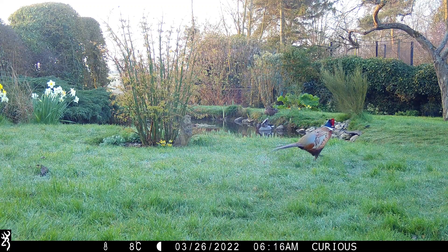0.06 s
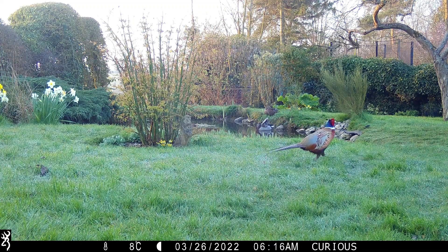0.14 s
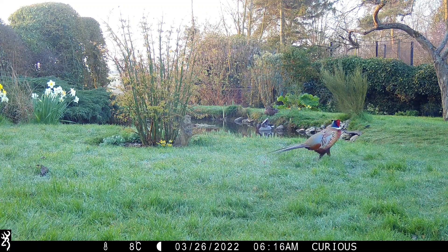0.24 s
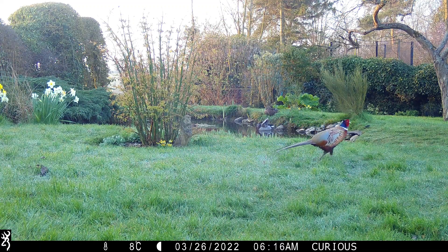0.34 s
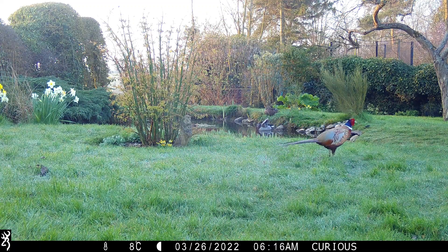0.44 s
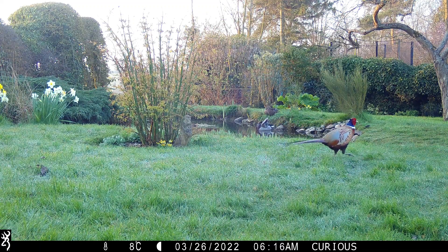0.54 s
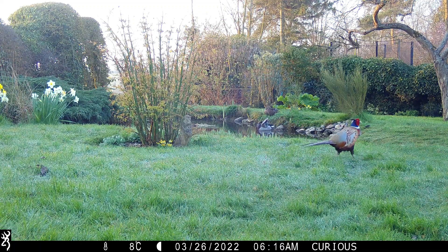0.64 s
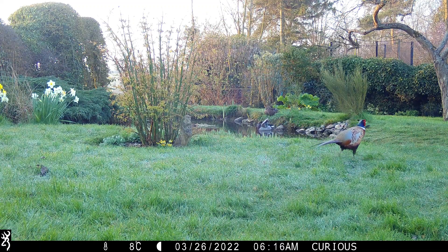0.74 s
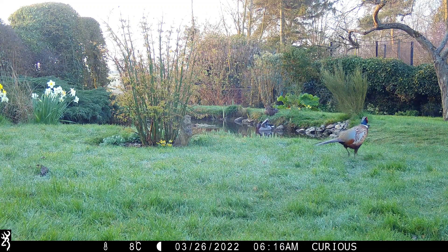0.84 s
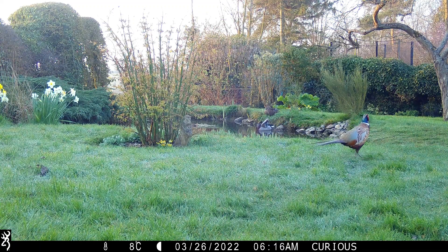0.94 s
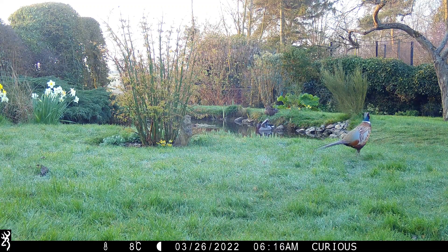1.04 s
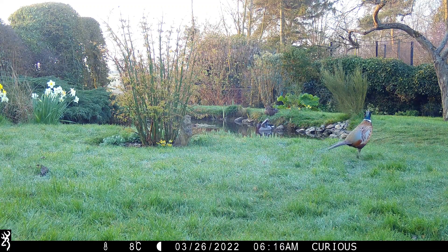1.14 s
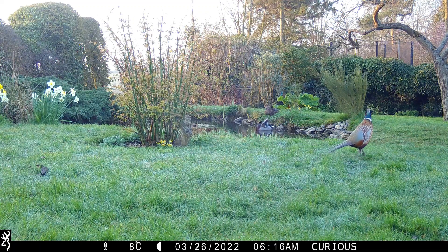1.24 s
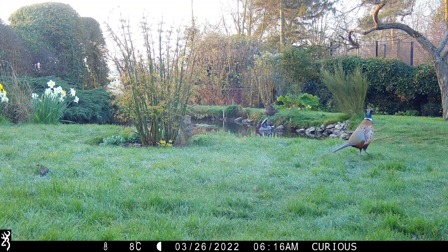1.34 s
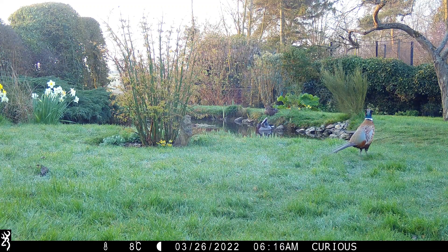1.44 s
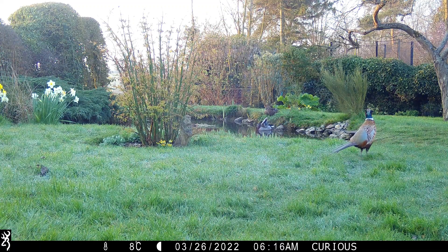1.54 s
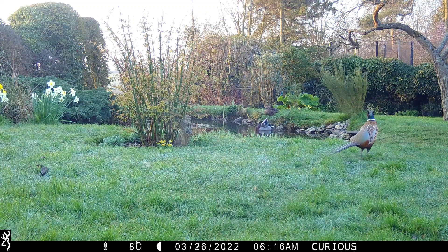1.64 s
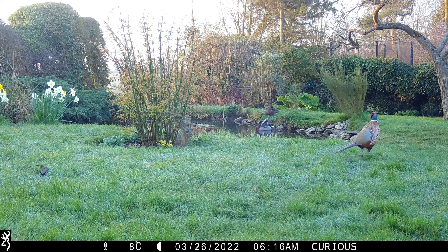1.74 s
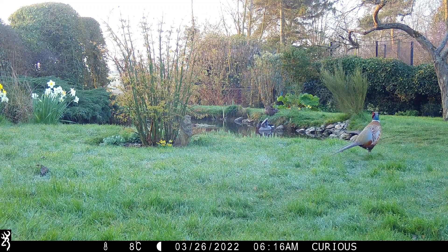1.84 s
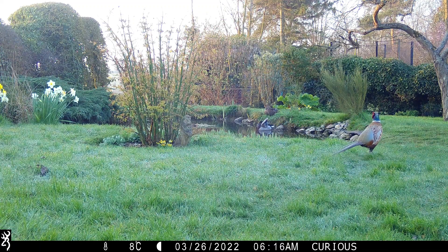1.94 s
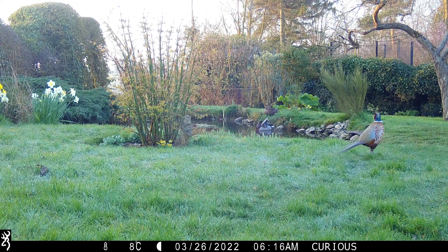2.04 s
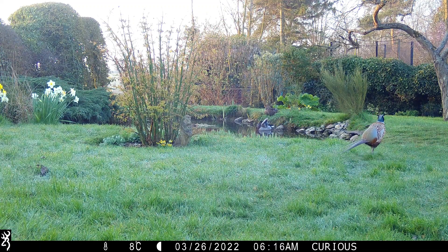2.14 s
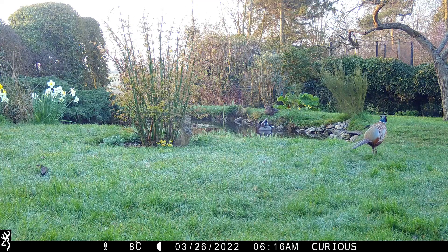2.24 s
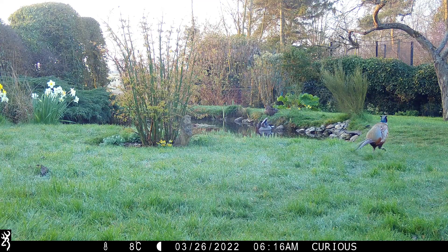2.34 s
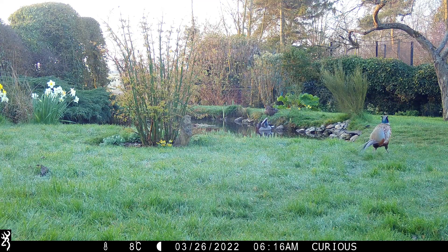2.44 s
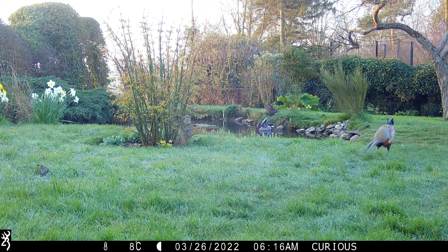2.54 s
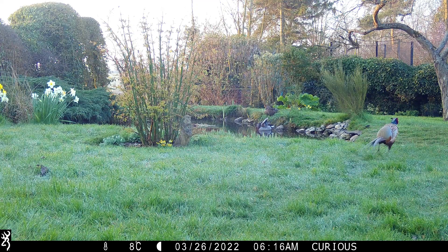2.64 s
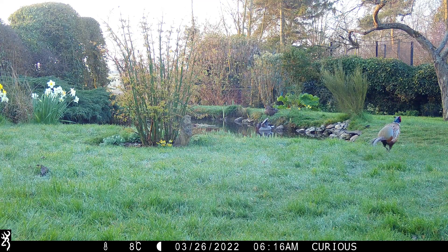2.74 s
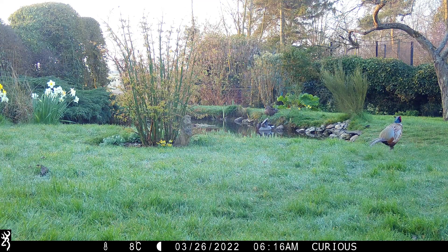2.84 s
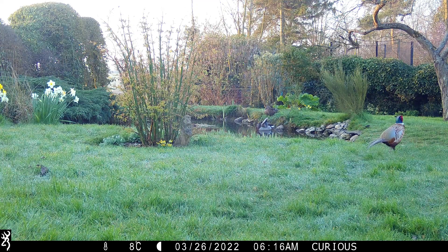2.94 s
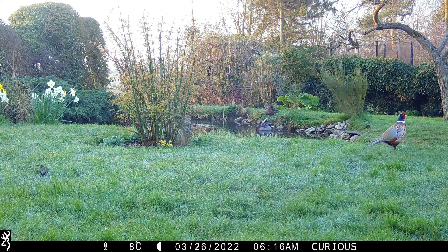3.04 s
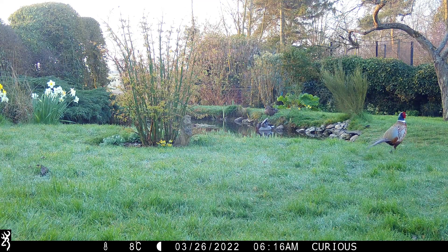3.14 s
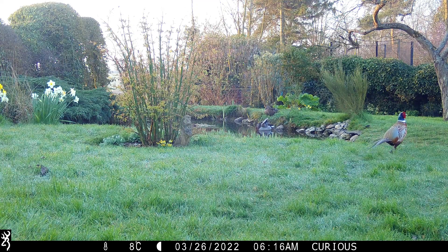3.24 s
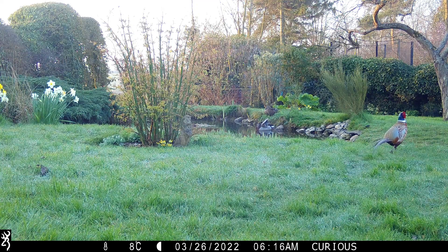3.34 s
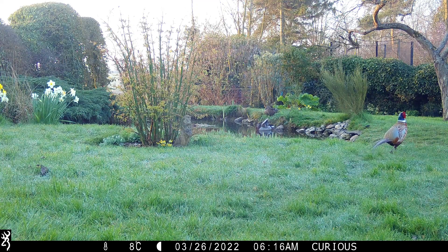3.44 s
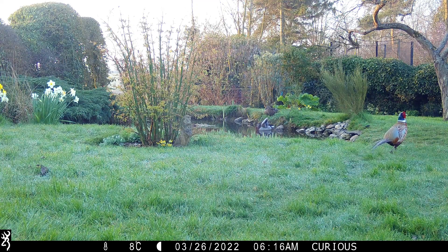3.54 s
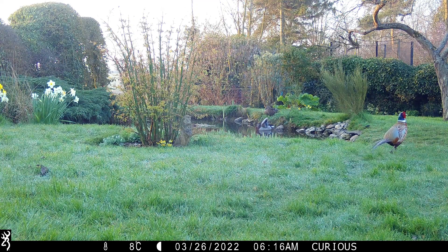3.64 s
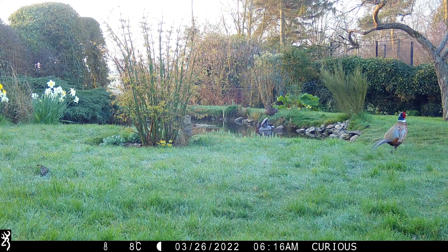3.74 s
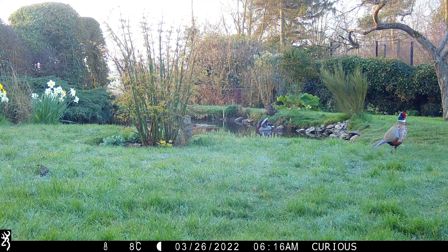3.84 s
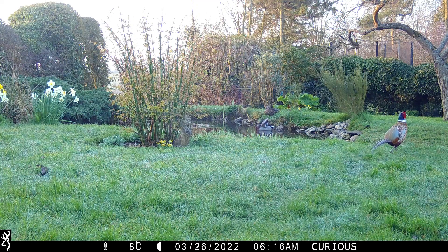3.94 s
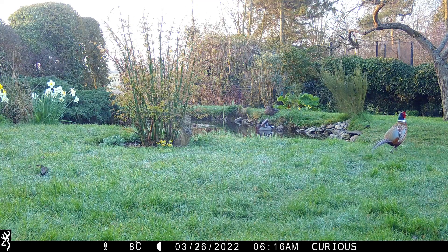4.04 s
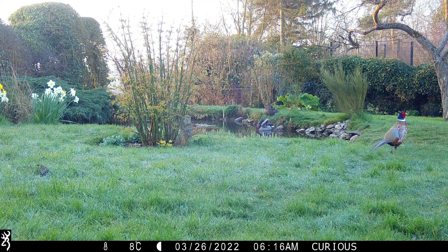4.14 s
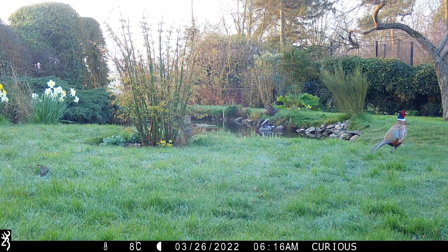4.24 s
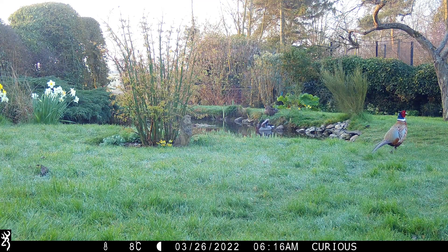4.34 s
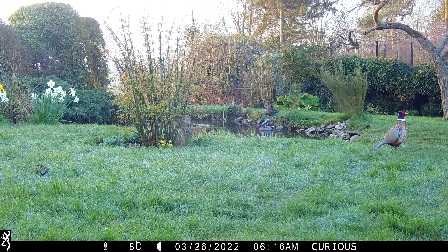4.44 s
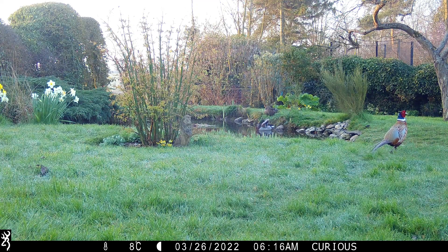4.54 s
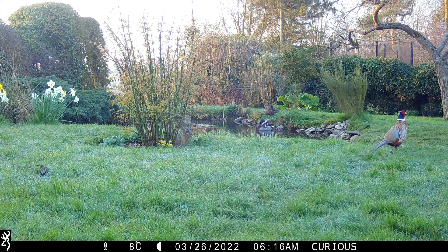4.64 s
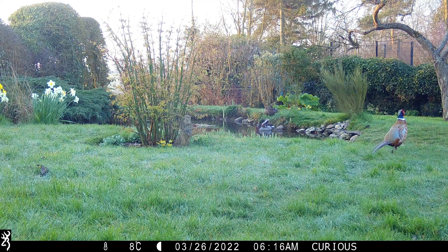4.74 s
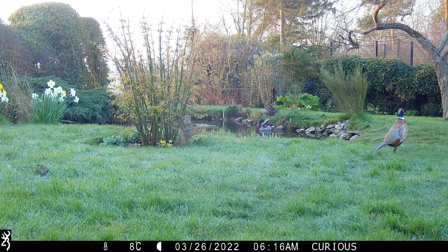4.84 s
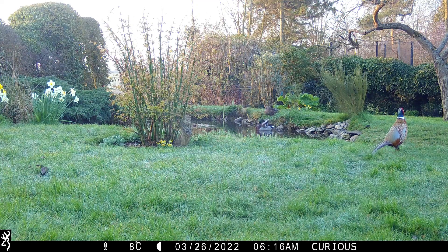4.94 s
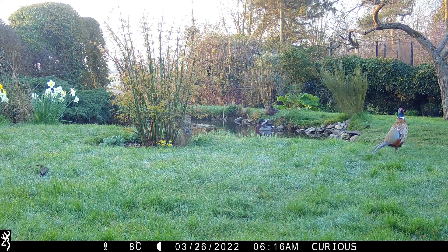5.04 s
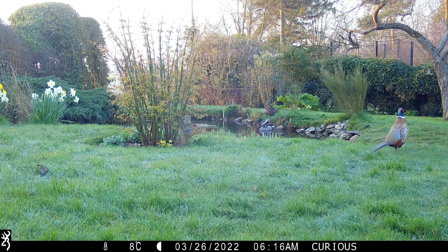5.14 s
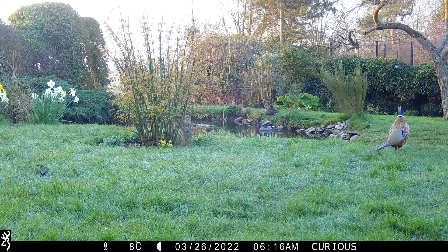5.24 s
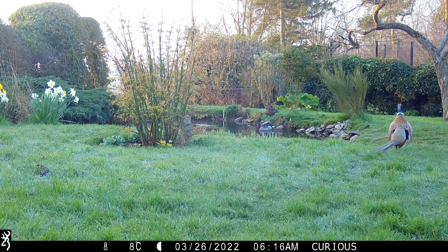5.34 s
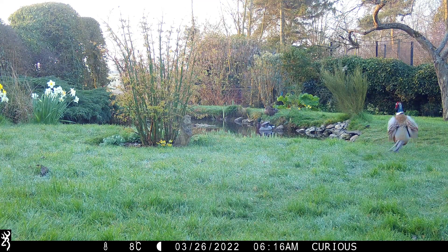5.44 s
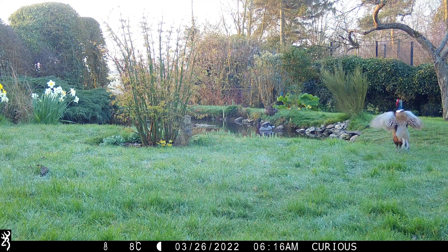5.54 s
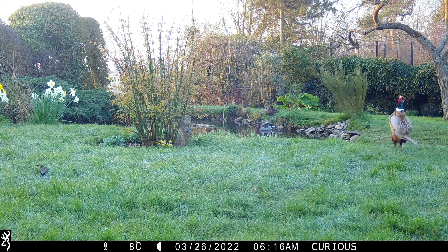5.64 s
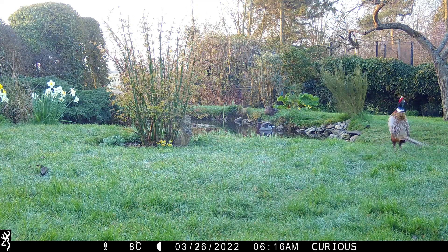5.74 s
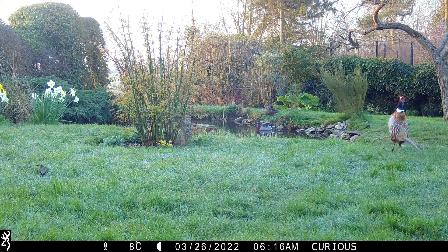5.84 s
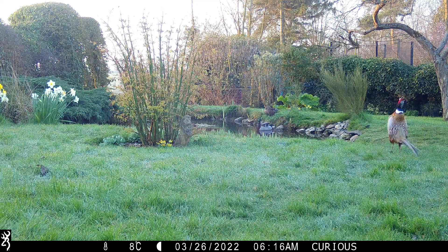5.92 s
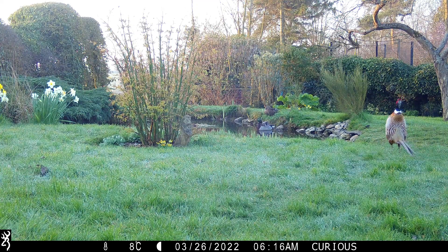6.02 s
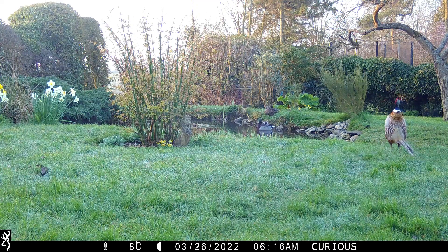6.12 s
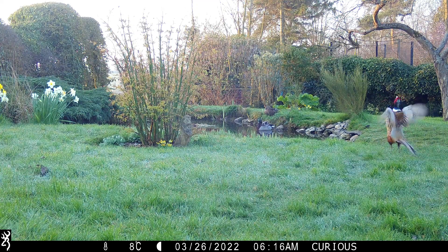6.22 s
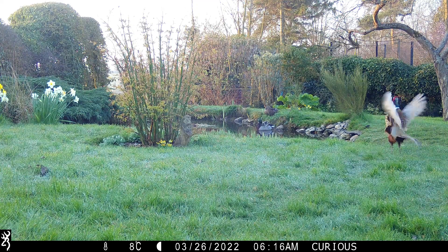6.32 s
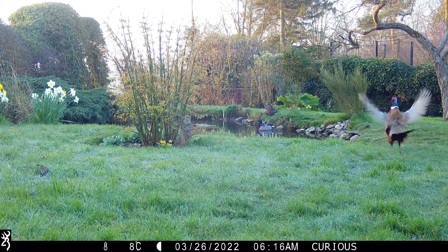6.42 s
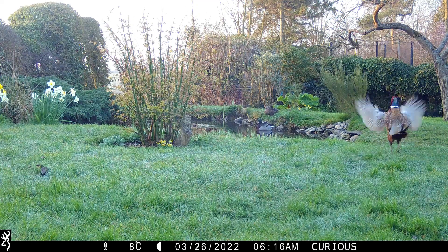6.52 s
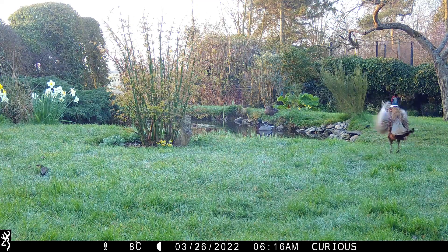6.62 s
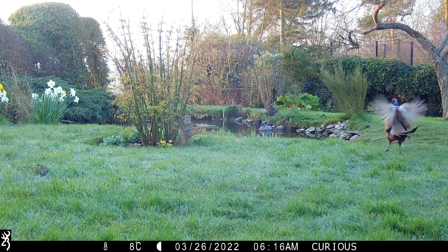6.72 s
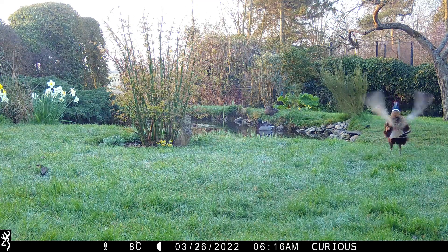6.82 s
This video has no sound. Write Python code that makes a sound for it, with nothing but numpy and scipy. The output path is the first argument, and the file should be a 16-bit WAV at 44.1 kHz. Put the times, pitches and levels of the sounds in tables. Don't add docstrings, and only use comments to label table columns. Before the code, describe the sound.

A calm dawn garden heard through a small, slightly dull outdoor microphone, with a soft low wash of distant traffic and air and very faint hiss. At 0 s an earlier birdsong echo dies among the trees. Far away, a dove coos low and wavering until about 5 s; a rook caws hoarsely at 1.7, 3.4, 4 and most loudly 5 s; thin songbird whistles and ticks come and go, with a quick trill at 4.7. A nearby sparrow-like bird gives bright, buzzy double-arched chirps at 1.0, 1.95, 2.9 and 3.3 s. At 5.7 a pheasant erupts in a quarter-second, rough, brassy crow, hugely louder and distorted, echoing briefly. Another chirp comes at 6.1, then a shorter crow at 6.3. Low air rumble starts around 6.5, and from 6.6 to the end, rapid wingbeats whirr with feather rush, sharp quill snaps and brief singing tones.

```python
import sys
import numpy as np
from scipy import signal
from scipy.fft import rfft, irfft
from scipy.io import wavfile
from scipy.ndimage import uniform_filter1d

SR = 44100
rng = np.random.default_rng(int(sys.argv[2]) if len(sys.argv) > 2 else 0)


def natural_amplitude(level_db):
    exponent = np.asarray(level_db, float) / 20
    return 10 ** exponent


def dump(signal):
    limited = np.clip(np.atleast_2d(signal).T, -1, 1)
    pcm = np.round(limited * 32767).astype(np.int16)
    wavfile.write(sys.argv[1], SR, pcm)


N = 303408


def evened(x):
    return x / np.sqrt(np.mean(x ** 2) + 1e-20)


def coloured(x, points):
    f, db = np.transpose(points)
    hz = np.fft.rfftfreq(len(x), 1 / SR)
    gain = natural_amplitude(np.interp(np.log(hz + 1), np.log(f + 1), db))
    return irfft(rfft(x) * gain, len(x))


def add(mix, start_s, sound):
    part = mix[round(start_s * SR):][:len(sound)]
    part += sound[:len(part)]


def follow(length_s):
    t = np.arange(0, length_s, 1 / SR)
    return t, t / length_s


def wander(count, seconds):
    window = np.hanning(int(2 * seconds * SR) + 3)
    return evened(signal.fftconvolve(rng.standard_normal(count), window, "same"))


def resonate(x, hz, width_hz):
    turn = np.exp(2j * np.pi * hz * np.arange(len(x)) / SR)
    r = np.exp(-np.pi * width_hz / SR)
    smooth = signal.lfilter([(1 - r) ** 2], [1, -2 * r, r * r], x / turn)
    return 2 * (turn * smooth).real


def whistle(hz, db, edge):
    turns = np.cumsum(hz) / SR
    return natural_amplitude(db + 4) * np.sin(2 * np.pi * turns) * signal.windows.tukey(len(hz), edge)


# multiple, level_db
CROW_OVERTONES = [(1, -4), (2, 1), (3, -15.5), (4, 2), (5, -20), (9, -38.5), (10, -47)]
# pitch_hz, width_hz, level_db
WINDPIPE = [(1055, 315, -4.5), (1611, 303, 1), (2150, 360, -2), (2727, 550, -9), (3300, 510, -9),
            (3868.7, 240, 1.5), (4300, 730, -8), (5078, 490, -4)]
ROUGH = .3


def crow(length_s, top_db, top_hz):
    t, u = follow(length_s)
    snap_db = -42 * np.exp(-u / 0.043)
    swell_db = -7 * np.exp(-t / 0.021)
    sag_db = -6 * t
    cut_db = -35.5 * np.maximum(1 - (length_s - t) / 0.036, 0) ** 2
    effort_db = top_db + snap_db + swell_db + sag_db + cut_db

    scoop = -.07 * np.exp(-t / .018)
    arch = .025 * np.sin(np.pi * u ** .8)
    hz = top_hz * (1 + scoop + arch + .014 * wander(len(t), .012))
    turns = np.cumsum(hz * (1 + .012 * wander(len(t), .004))) / SR

    tone = np.zeros(len(t))
    for multiple, db in CROW_OVERTONES:
        flicker_db = 1.8 * wander(len(t), .004)
        tone += natural_amplitude(db + flicker_db) * np.cos(2 * np.pi * multiple * turns)
    puffs = (0.28 + np.exp(-(turns % 1) / 0.481)) * rng.standard_normal(len(t))
    breath = np.zeros(len(t))
    for k, (hz, width_hz, db) in enumerate(WINDPIPE):
        breath += (-1) ** k * natural_amplitude(db) * resonate(puffs, hz, width_hz)
    voice = np.sqrt(1 - ROUGH) * evened(tone) + np.sqrt(ROUGH) * evened(breath)
    return natural_amplitude(effort_db + 2) * voice * signal.windows.tukey(len(t), .05)


# start_s, length_s, effort_db, pitch_hz
CROWS = [
    (5.675, .247, -9.5, 1050),
    (6.302, 0.1227, -10, 1050),
]


def game_bird():
    out = np.zeros(N)
    for start_s, *how in CROWS:
        add(out, start_s, crow(*how))
    return out


# pitch_hz, level_db
HOUSING = [(2000, 2.5), (6400, -1.5), (7400, -27.5), (8400, -21), (10000, -7), (12000, -14.5), (14500, -34)]


def through_housing(x):
    return coloured(x, HOUSING)


# start_s, feather_rush_db, low_push_db
STROKES = [
    (6.611, -46, -49),
    (6.668, -45, -45),
    (6.698, -43, -47),
    (6.746, -48, -54),
    (6.777, -45, -45),
    (6.824, -45, -49),
    (6.852, -42.5, -58),
    (6.864, -58.5, -44),
]
# start_s, peak_db, bright_edge_db
SNAPS = [
    (6.631, -33, -66),
    (6.649, -37, -52),
    (6.673, -41.5, -65),
    (6.693, -44, -53.5),
    (6.715, -52, -66),
    (6.732, -36, -49),
    (6.78, -37.5, -58),
    (6.803, -43, -62),
    (6.852, -38.5, -60),
    (6.878, -41, -56),
]
# start_s, length_s, pitch_hz, level_db
FEATHER_NOTES = [
    (6.592, 0.016, 2830, -54),
    (6.756, 0.0234, 2740, -50),
    (6.836, 0.021, 2694, -43),
]
# pitch_hz, level_db (per Hz)
RUSH = [(410, -32), (700, -17.5), (1500, 3), (2850, -4.5), (3650, -17), (4470, -6), (7200, -41),
        (7920, -39.5), (12000, -46), (15600, -78), (22000, -120)]


def wings():
    rush, push, snaps, edges, notes = np.zeros((5, N))
    t = np.arange(2600) / SR
    for start_s, rush_db, push_db in STROKES:
        add(rush, start_s, natural_amplitude(rush_db) * (t / 0.0098 * np.exp(1 - t / 0.0081)) ** 2)
        add(push, start_s, natural_amplitude(push_db) * (t / 0.0086 * np.exp(1 - t / 0.0082)) ** 2)
    for start_s, db, edge_db in SNAPS:
        add(snaps, start_s, natural_amplitude([db]))
        add(edges, start_s, natural_amplitude([edge_db]))
    for start_s, length_s, hz, db in FEATHER_NOTES:
        hz = np.full(int(length_s * SR), hz)
        add(notes, start_s, whistle(hz, db, 0.63) + whistle(2 * hz, db - 20.5, 0.53))

    blur_s, blur_db, slack_s, slack_db = 6.585, -49.5, 6.8, -56
    t = follow(N / SR - blur_s)[0]
    slackened = np.clip((blur_s + t - slack_s) / 0.011, 0, 1)
    add(rush, blur_s, natural_amplitude(blur_db + (slack_db - blur_db) * slackened))

    grain = natural_amplitude(3.0 * wander(N, 0.0017))
    air = rush * grain * rng.standard_normal(N)
    rush = evened(coloured(air, RUSH)) * np.std(rush)
    push = push * evened(resonate(rng.standard_normal(N), 382, 280))
    snaps = 20.0 * resonate(snaps, 2000, 1500) + 3.0 * resonate(snaps, 4600, 900)
    snaps = through_housing(snaps) + 7.0 * resonate(edges, 9800, 1500)
    return rush + push + snaps + notes


def gust():
    out = np.zeros(N)
    start_s, steady_db, blast_db, decay_s = 6.465, -60, 7, .04
    t = follow(N / SR - start_s)[0]
    rumble = coloured(rng.standard_normal(len(t)), [(15, -9.0), (30, -6), (120, 0.5), (250, -1.5), (500, -41)])
    level = natural_amplitude(steady_db + blast_db * np.exp(-t / decay_s))
    add(out, start_s, level * evened(rumble) * np.minimum(t / 0.033, 1))
    return out


# multiple, level_db (under the second)
CHIRP_HARMONICS = [(2, 0), (3, -16), (4, -19)]


def syrinx(hz, db, second_db, strain):
    hz = hz * (1 + 0.01483 * wander(len(hz), 0.0016))
    db = db + 1.0 * wander(len(hz), .002)
    upper = sum(whistle(k * hz, db + second_db + drop_db, 0.092) for k, drop_db in CHIRP_HARMONICS)
    flutter = 1 + strain * wander(len(hz), 0.00069)
    return flutter * whistle(hz, db, 0.12) + upper * (1 + .5 * wander(len(hz), 0.000581))


# from_hz, to_hz, level_db, second_harmonic_db
LEADS = [(2740, 2900, -40, 10.5), (2950, 3200, -31.5, 1.5)]
# start_s, rise_s, climb_quickness, top_hz, level_db
LOW_VOICE = [
    (.065, .032, 2.6, 4587, -3),
    (.145, .034, 2.2, 4505, -6),
]
HIGH_VOICE = [
    (.066, .030, 4.2, 4904, -3.5),
    (.148, .028, 2.4, 4866, -8.5),
]
SIDE_VOICE = [
    (0.069, 0.0246, 4.0, 5620, -25),
]
LINK = [
    (.113, .028, .85, 4800, -10),
]
# foot_hz, fall_s
BENDS = [(3170, 0.013), (3450, 0.0045), (4800, .003), (3050, .003)]


def chirp(level_db, pitch, last_db, last_delay_s):
    out = np.zeros(SR // 4)
    t, u = follow(.044)
    for from_hz, to_hz, db, second_db in LEADS:
        curl = 1 + .09 * u ** 6
        hz = pitch * (from_hz + (to_hz - from_hz) * u) * curl
        add(out, 0.022, syrinx(hz, db + 9 * u, second_db, 0.17))

    for arches, (foot_hz, fall_s) in zip((LOW_VOICE, HIGH_VOICE, SIDE_VOICE, LINK), BENDS):
        for start_s, rise_s, quickness, top_hz, db in arches:
            t = follow(rise_s + fall_s)[0]
            last = start_s > .14
            below = np.maximum(1 - t / rise_s, 0) ** quickness
            past = np.maximum(t - rise_s, 0)
            hz = top_hz - (top_hz - foot_hz) * below - 128000 * past
            crest_db = 3 * (start_s < .1) * np.exp(-((t - rise_s) / 0.011) ** 2)
            db = db + last * last_db - 13.5 * below ** 1.43 + crest_db - 21 * past / fall_s
            second_db = -38 + 14 * (below + past / fall_s)
            strain = .16 + .6 * np.exp(-((start_s + t - .13) / .015) ** 2)
            add(out, start_s + last * last_delay_s, syrinx(pitch * hz, db, second_db, strain))

    breath = evened(resonate(rng.standard_normal(1400), 4200 * pitch, 1300))
    add(out, 0, natural_amplitude(-25.5) * breath * np.hanning(1400))
    return natural_amplitude(level_db) * through_housing(out)


# start_s, level_db, pitch_factor, last_arch_db, last_arch_delay_s
CHIRPS = [
    (1.0, -29.5, 0.99, -0.1, -0.00073),
    (1.951, -30.5, 0.97, -2, -0.0032),
    (2.896, -31.5, 0.98, 0.2, -0.0034),
    (3.315, -30, 1.0, -0.2, -.001),
    (6.127, -29.5, 0.99, 1, -0.006),
]


def small_bird():
    out = np.zeros(N)
    for start_s, *how in CHIRPS:
        add(out, start_s, chirp(*how))
    return out


def glide(length_s, from_hz, to_hz, db, edge, bow=0., waver=0.):
    t, u = follow(length_s)
    drift_s = min(.03, length_s / 4)
    bend = 1 + bow * np.sin(np.pi * u) + waver * wander(len(t), drift_s)
    hz = (from_hz + (to_hz - from_hz) * u) * bend
    return whistle(hz, db + (.8 + 70 * waver) * wander(len(t), drift_s), edge)


# start_s, length_s, from_hz, to_hz, level_db
COOS = [
    (.14, .5, 489, 571, -61),
    (.79, 0.23, 545, 450, -62),
    (1.42, 0.14, 464, 489, -65.5),
    (1.74, 0.24, 455, 458, -66),
    (2.3, .24, 460, 517, -66.5),
    (2.83, 0.52, 492, 555, -60.5),
    (3.5, 0.216, 544.2, 475, -62),
    (4.14, .13, 481.1, 445, -65.5),
    (4.44, 0.17, 460, 459, -67),
    (5.02, 0.15, 451, 479, -69),
]


def dove(out):
    for start_s, *how in COOS:
        add(out, start_s, glide(*how, .12, 0., .012))


# start_s, length_s, throat_hz, level_db
CAWS = [
    (1.66, 0.31, 1330, -60.5),
    (2.678, .2, 3100, -76),
    (3.441, 0.276, 1380, -64),
    (4.053, 0.23, 1593, -66),
    (4.959, 0.338, 1390, -56),
]


def rook(out):
    for start_s, length_s, hz, db in CAWS:
        t = follow(length_s)[0]
        rattle = 1 + 0.45 * np.sin(2 * np.pi * 75 * t)
        noise = rattle * rng.standard_normal(len(t))
        throat = resonate(noise, hz, 380) + 0.23 * resonate(noise, 1.3 * hz, 300)
        add(out, start_s, natural_amplitude(db) * evened(throat) * signal.windows.tukey(len(t), .4))


# start_s, length_s, from_hz, to_hz, level_db
WHISTLES = [
    (.06, 0.033, 4395, 3450, -70),
    (.355, .03, 5950, 3500, -75),
    (.376, 0.077, 3570, 3576, -71),
    (.63, 0.058, 3800, 3720, -78),
    (1.35, .2, 4300, 3200, -82),
    (1.599, 0.27, 4990, 2870, -78),
    (3.91, 0.31, 5050, 3200, -82),
    (4.294, .29, 4900, 2950, -74),
    (5.28, 0.089, 4300, 3900, -72),
]
BOWS = [0, 0.0017, .04, .03, -0.02, 0, -.03, -0.055, .12]
# start_s, length_s, from_hz, to_hz, level_db
TICKS = [
    (0, .059, 4400, 4630, -71),
    (0.112, 0.019, 4620, 4300, -66),
    (.568, .04, 3700, 3300, -76),
    (5.162, .017, 4090, 3800, -78),
    (5.265, .02, 5200, 4300, -72),
    (5.398, .02, 4600, 4350, -73),
]
# start_s, level_db
CHIPS = [
    (2.57, -85),
    (2.7, -82),
    (2.807, -80),
    (3.56, -80),
    (3.7, -82),
    (3.83, -82),
    (3.97, -81),
    (4.1, -83),
    (4.27, -82),
]
# start_s, length_s, from_hz, to_hz, level_db
TRILL = (4.735, .36, 4000, 3300, -65)


def songbirds(out):
    for (start_s, *how), bow in zip(WHISTLES, BOWS):
        add(out, start_s, glide(*how, .25, bow))
    for start_s, *how in TICKS:
        add(out, start_s, glide(*how, .84))
    for start_s, db in CHIPS:
        add(out, start_s, glide(0.035, 6100, 5090, db, 0.76))

    start_s, length_s, from_hz, to_hz, db = TRILL
    t, u = follow(length_s)
    hz = to_hz + (from_hz - to_hz) * np.exp(-t / .08)
    beat = (start_s + t) * 46.1 % 1
    notes = whistle(hz * (1.09 - .18 * beat), db - 8.5 * (2 * u - 1) ** 2, .1)
    add(out, start_s, notes * np.sin(np.pi * beat) ** 4)


def earlier_song(out):
    t = follow(0.44)[0]
    level = natural_amplitude(-62.5 - 26 * (1 - np.exp(-t / 0.18)))
    for hz, width_hz in ((4600, 920), (5090, 120)):
        add(out, 0, level * evened(resonate(rng.standard_normal(len(t)), hz, width_hz)))


def far_birds():
    out = np.zeros(N)
    dove(out)
    rook(out)
    songbirds(out)
    earlier_song(out)
    return out


# pitch_hz, level_db (per Hz)
WASH = [(15, -41), (25, -18.5), (255, -1.5), (316, -1), (483, 1), (1400, 0), (2660, -7), (4700, -20.5),
        (6100, -33), (7200, -44), (9360, -63), (15800, -120)]


def wash():
    frames = N // 256 + 5
    a, b, patches = rng.standard_normal((frames, 513, 3)).T
    patches = uniform_filter1d(patches, 12, 0)
    patches = evened(uniform_filter1d(patches, 20, 1))
    spectra = (a + 1j * b) * natural_amplitude(1.0 * patches)
    noise = signal.istft(spectra, nperseg=1024, noverlap=768)[1][:N]
    return natural_amplitude(-59) * evened(coloured(noise, WASH))


# pitch_hz, t60_s
GARDEN = [(500, 0.79), (1300, 0.54), (3500, 0.54), (6000, 0.43), (10000, 0.52)]
# delay_s, level_db
ECHOES = [(.012, -13.5), (.021, -20), (.034, -22), (.047, -26.5), (.062, -29)]


def garden(x, tail_db):
    taps = np.zeros(SR)
    at = np.arange(300, SR - 20, 20)
    taps[at + rng.integers(0, 20, len(at))] = rng.choice([-1., 1.], len(at))
    hz, t, z = signal.stft(taps, SR, nperseg=256)
    f, t60 = np.transpose(GARDEN)
    decay = natural_amplitude(-60 * t / np.interp(hz, f, t60)[:, None])
    tail = signal.istft(z * decay, SR, nperseg=256)[1]
    tail = natural_amplitude(tail_db) * tail / np.linalg.norm(tail)
    for delay_s, db in ECHOES:
        add(tail, delay_s, natural_amplitude([db]))
    return x + signal.fftconvolve(x, tail)[:N]


def scene():
    mix = garden(game_bird(), -18.5) + garden(small_bird(), -15) + garden(wings(), -15)
    mix = mix + wash() + gust() + garden(far_birds(), -17)
    return mix[None]


def low_pass(x):
    return signal.sosfilt(signal.butter(12, 15960, fs=SR, output="sos"), x)


# pitch_hz, level_db
OVERLOAD = [(25, 1), (300, 4.5), (800, 2.5), (5200, 0), (6000, -19.5), (9000, -18.5), (13600, -4),
            (15500, -12)]
# pitch_hz, width_hz
SMEAR = [(1100, 804), (2100, 1300), (4200, 590)]


def record(dry):
    t = np.arange(N) / SR
    tops = dry[0] - np.clip(dry[0], -.36, .3)
    tops = signal.sosfilt(signal.butter(2, 30, "high", fs=SR, output="sos"), tops)
    wave = dry[0] - coloured(tops, OVERLOAD)
    for hz, width_hz in SMEAR:
        r = np.exp(-np.pi * width_hz / SR)
        poles = np.array([1, -2 * r * np.cos(2 * np.pi * hz / SR), r * r])
        wave = signal.lfilter(poles[::-1], poles, wave)

    frames_per_s, whine_hz, whine_db = 29.72, 7797.5, -80
    flips = np.sign(np.sin(2 * np.pi * frames_per_s * (t - .002))) - .12
    whine = natural_amplitude(whine_db + 2.5) * flips * np.sin(2 * np.pi * whine_hz * t)
    hiss = natural_amplitude(-87) * rng.standard_normal(N)
    return low_pass((wave + whine + hiss)[None])


dry = scene()
out = record(dry)
dump(out)
```